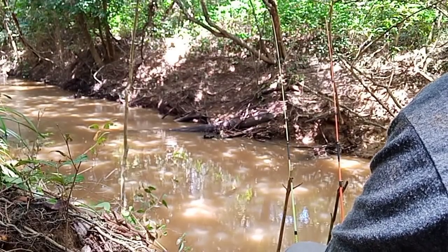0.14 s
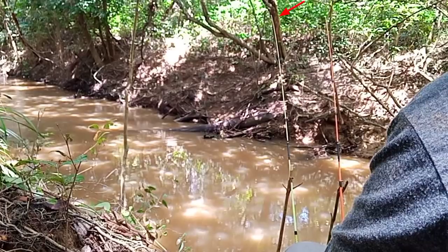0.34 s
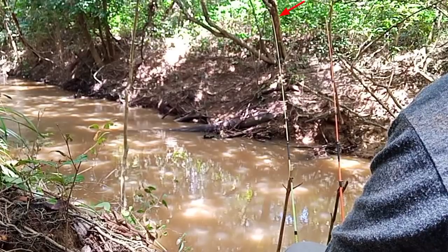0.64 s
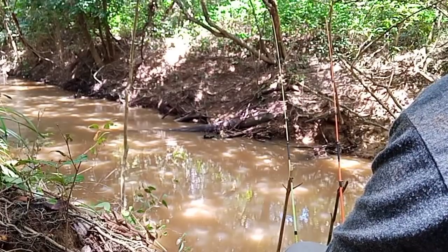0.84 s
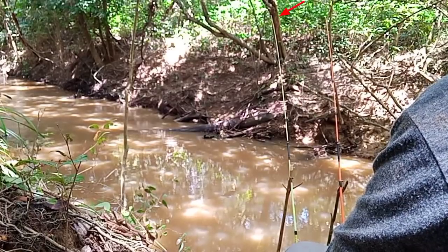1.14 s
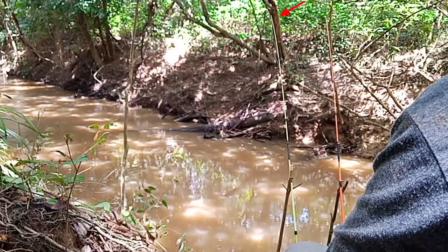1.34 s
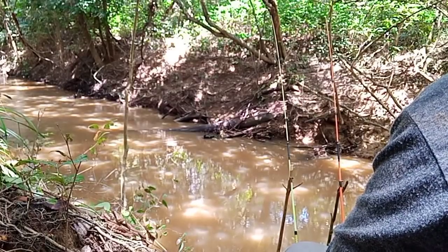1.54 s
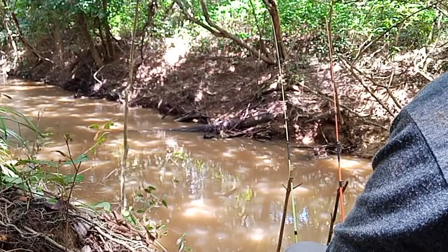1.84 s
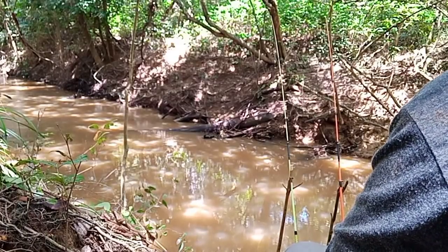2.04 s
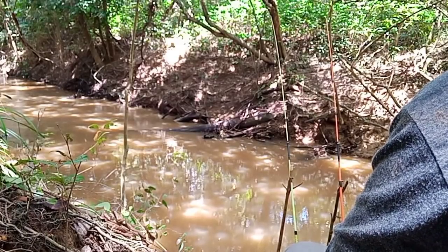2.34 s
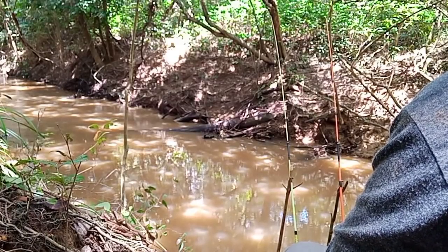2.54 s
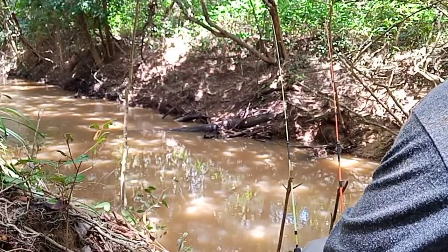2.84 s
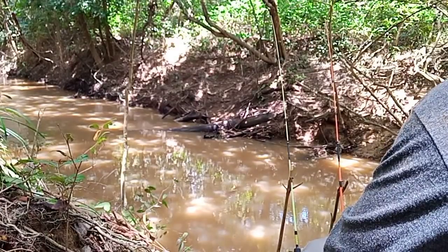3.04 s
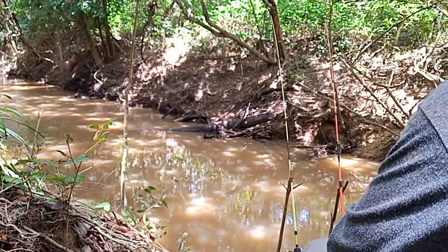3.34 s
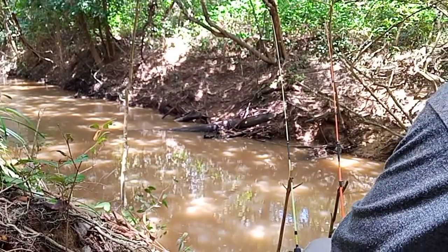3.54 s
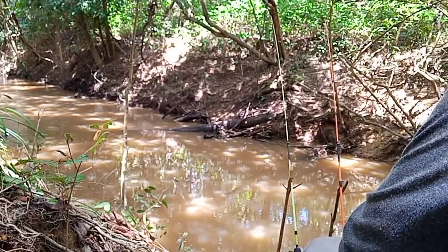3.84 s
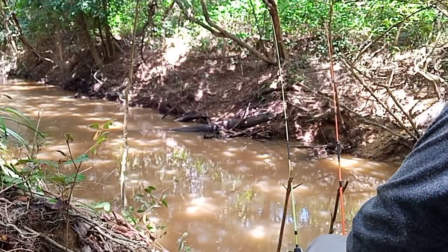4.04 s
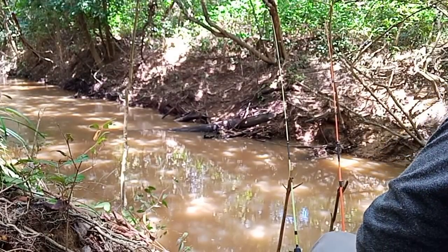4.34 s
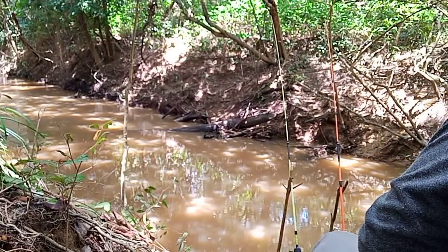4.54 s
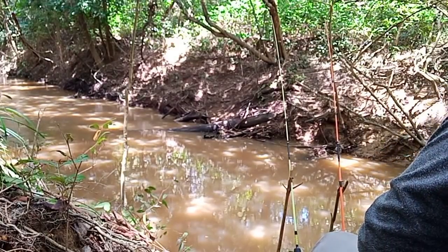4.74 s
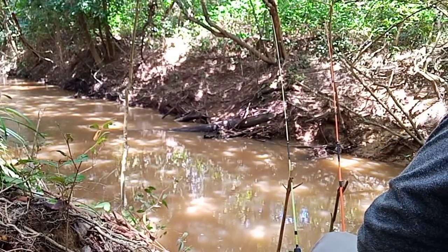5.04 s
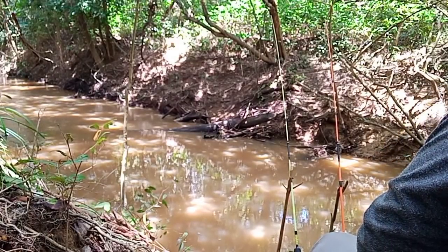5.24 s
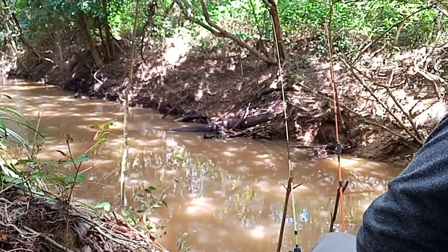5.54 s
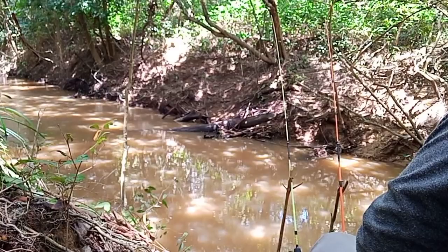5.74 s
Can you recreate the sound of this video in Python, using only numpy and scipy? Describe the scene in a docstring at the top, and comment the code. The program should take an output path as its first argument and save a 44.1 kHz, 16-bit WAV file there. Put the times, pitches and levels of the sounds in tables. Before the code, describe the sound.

On a wooded riverbank, cicadas make a loud, continuous chorus in layers: a shrill sizzle, a dense high drone and a lower rasp. About halfway the chorus dips briefly, then another singer enters in surges and holds. The slow river murmurs very faintly with a few tiny plops. Close to the microphone, a shifting leg gives barely audible bumps and a brush of cloth, followed later by a few light taps.

```python
"""On the wooded bank of a slow, muddy river, cicadas sing a shrill sizzle, a dense drone and a low rasp.
Each voice is an impulse train from buckling tymbal ribs, filtered by the resonance of a hollow body
and scattered by trunks and leaves. One shrill singer fades; a second starts in surges, then holds.
A far insect adds a thin note, and the river murmurs faintly with a few ringing bubbles.
Close by are light taps, padded bumps and a brush of cloth as a leg shifts."""
import sys
import numpy as np
from scipy import signal
from scipy.fft import rfft, irfft, next_fast_len
from scipy.io import wavfile
from scipy.ndimage import map_coordinates

SR = 44100
rng = np.random.default_rng(int(sys.argv[2]) if len(sys.argv) > 2 else 0)


def generate_wav(signal):
    """Clip the signal to [-1, 1] and save it as 16-bit WAV at the path in sys.argv[1]."""
    frames = np.transpose(np.atleast_2d(signal))
    scaled = np.clip(frames, -1, 1) * 32767
    pcm = np.round(scaled).astype(np.int16)
    wavfile.write(sys.argv[1], SR, pcm)


N = 259308


def tymbal(rate, throb_hz, throb_db, jitter_s=.00022):
    """Impulse excitation: ribs buckle at a slightly uneven rate as the abdomen pumps their strength."""
    cycles = rng.random() + np.cumsum(rate * (1 + .008 * wobble(5))) / SR
    clicks = np.flatnonzero(np.diff(np.floor(cycles)))
    lateness, strength = rng.standard_normal((len(clicks), 2)).T
    clicks = (clicks + jitter_s * SR * lateness).astype(int) % N
    pump_cycles = rng.random() + np.cumsum(throb_hz * (1 + .01983 * wobble(2.014))) / SR
    pump = np.sin(2 * np.pi * pump_cycles)
    return np.bincount(clicks, amp(throb_db * pump[clicks] + 1.34 * strength), N)


def crowd(rate, throb_hz, throb_db, wet, count):
    """Incoherent summation: several cicadas add up, each at its own pace and with its own echoes."""
    paces = np.exp(.2 * rng.standard_normal((count, 2)))
    voices = (tymbal(rate * click_pace, throb_hz * throb_pace, throb_db)
              for click_pace, throb_pace in paces)
    return unit(sum(forest(voice, wet, t60=.33) for voice in voices))


# Body resonances of the two shrill singers. Each row: frequency in Hz, relative gain in dB.
FIRST_SINGER_BODY = [(10800, -45), (11600, -28), (11950, -19), (12250, -11), (12550, -3), (12750, -3),
                     (12970, 0), (13250, -6), (13550, -11), (14000, -15), (14400, -11), (14950, -12),
                     (15280, -10.5), (15430, -5), (15600, -20)]
SECOND_SINGER_BODY = [(10200, -40), (11300, -34), (11900, -25), (12400, -17), (12640, -6), (12850, -6),
                      (13040, 0), (13220, -6), (13500, -10), (13900, -15), (14400, -11), (14820, -7),
                      (15120, -14), (15420, -9), (15600, -20)]
# Pace of one tymbal of the second singer. Each row: time in seconds, rate in clicks per second.
SECOND_CLICK_RATE = [(3.1, 126), (4.0, 133), (4.7, 118), (5.2, 122), (5.88, 140)]
def shrill_singers():
    """Source and filter: clicks excite high body resonances, first in a throb, later in a buzz."""
    main_db = lead_db(-24.5, fade_db_per_s=1.3, full_db=-24.8, cold_db=0, slack_db=9.5)
    top_db = lead_db(-28.8, fade_db_per_s=2.2, full_db=-29.7, cold_db=4.8, slack_db=3.8)
    rate = curve(SECOND_CLICK_RATE)
    first = forest(tymbal(186, throb_hz=30.5, throb_db=5.5), wet=.55, t60=.06)
    first += amp(2) * crowd(rate=225, throb_hz=26, throb_db=2.5, wet=.8, count=4)
    # left and right tymbals alternate, which doubles the click rate
    second = forest(tymbal(2 * rate, throb_hz=27, throb_db=3.5, jitter_s=.00007), wet=.5, t60=.08)
    second += amp(-4) * forest(tymbal(rate, throb_hz=27, throb_db=2, jitter_s=.00003), wet=.5, t60=.08)
    second += amp(3) * crowd(rate=230, throb_hz=30, throb_db=2.5, wet=.8, count=3)
    song = handover(coloured(first, FIRST_SINGER_BODY), coloured(second, SECOND_SINGER_BODY))
    top = filtered(song, lambda hz: np.clip((hz - 13500) / 500, 0, 1))
    flutter_db = .5 * wobble(8.5)
    return amp(main_db + flutter_db) * unit(song - top) + amp(top_db) * unit(top)


# The second singer's surges. Each row: peak time in seconds, length in seconds, strength from 0 to 1.
EFFORT_SURGES = [(3.156, 0.072, 0.84), (3.589, .11, .95), (3.996, .18, .6), (4.394, .14, 0.99),
                 (4.68, .14, 0.7)]
def warmth_and_effort():
    """Pulses on a rising baseline: the second singer's effort sags less between surges as it warms."""
    t = np.arange(N) / SR
    warmth = ramp(3.22, 4.96)
    surges = sum(strength * .5 ** (np.abs(2 * (t - peak) / length) ** np.e)
                 for peak, length, strength in EFFORT_SURGES)
    return warmth, warmth + (1 - warmth) * surges


def second_singer_db(full_db, cold_db, slack_db):
    """Level follows drive: a band falls short of full song while the singer is cold or slack."""
    warmth, effort = warmth_and_effort()
    return full_db - cold_db * (1 - warmth) - slack_db * (1 - effort)


# The lead passes between singers. Each row: time in seconds, share of the later set from 0 to 1.
LATE_SHARE = [(2.55, 0.05), (2.84, 0.96)]
def handover(early, late):
    """Constant-power crossfade: one set of singers gives way to the next."""
    angle = np.pi / 2 * curve(LATE_SHARE)
    return np.cos(angle) * early + np.sin(angle) * late


def lead_db(start_db, fade_db_per_s, full_db, cold_db, slack_db):
    """Exponential decay: the first singer's level falls evenly in dB, then yields to the second's."""
    share = curve(LATE_SHARE)
    first_db = start_db - fade_db_per_s * np.arange(N) / SR
    return (1 - share) * first_db + share * second_singer_db(full_db, cold_db, slack_db)


# Spectra before and after the handover. Each row: frequency in Hz, relative gain in dB.
EARLY_DRONE_BAND = [(4900, -56), (5250, -41), (5550, -26), (5850, -14.5), (6100, -5), (6450, 4), (6850, -1),
                    (7250, -1.5), (7650, -7.5), (8100, -19), (8500, -33), (9300, -51)]
LATE_DRONE_BAND = [(4900, -59), (5250, -38.5), (5550, -19.5), (5900, -7), (6300, 1), (6650, 2.5),
                   (7200, -1), (7650, -9), (8100, -13.5), (8500, -26.5), (9300, -48)]
EARLY_SIZZLE_BAND = [(7900, -25), (8450, -4), (8800, -5.5), (9200, 1), (9400, -2.5), (9620, 3.5),
                     (9900, -0.5), (10050, -5), (10450, -5.5), (11100, -14), (12000, -40)]
LATE_SIZZLE_BAND = [(7900, -28), (8450, -4.5), (8800, -1.5), (9200, 6), (9700, 3), (10200, 0), (11100, -14),
                    (12000, -22)]
def drone():
    """Superposition: many click trains merge into one loud band, with a weak, high sizzle above it."""
    clicks = crowd(rate=260, throb_hz=33, throb_db=2.5, wet=.83, count=6)
    main = handover(amp(-25) * coloured(clicks, EARLY_DRONE_BAND),
                    amp(-27) * coloured(clicks, LATE_DRONE_BAND))
    # the sizzle lies between the drone and the shrill band, rising and falling with the lead singers
    sizzle_db = lead_db(-40, fade_db_per_s=1, full_db=-43, cold_db=2.5, slack_db=2)
    sizzle = handover(coloured(clicks, EARLY_SIZZLE_BAND), amp(-1) * coloured(clicks, LATE_SIZZLE_BAND))
    return main + amp(sizzle_db) * sizzle


# Body resonance of the lowest voices. Each row: frequency in Hz, relative gain in dB.
RASP_BAND = [(2550, -36), (2820, -24.5), (3020, -1.5), (3170, -4), (3320, 4), (3450, -3), (3600, -3.5),
             (3800, -10.5), (4200, -21.5), (4700, -30.5), (5300, -37)]
def rasp():
    """Amplitude modulation: the lowest voices rattle with a throb that quickens at the handover."""
    level_db = lead_db(-38.5, fade_db_per_s=1.8, full_db=-40.2, cold_db=4, slack_db=2.5)
    early = tymbal(222, throb_hz=26.3, throb_db=5)
    late = tymbal(248, throb_hz=42.7, throb_db=5)
    near = forest(handover(early, late), wet=.58, t60=.15)
    clicks = near + amp(1.5) * crowd(rate=190, throb_hz=45, throb_db=2.5, wet=.54, count=4)
    body = coloured(clicks, RASP_BAND)
    ring = handover(0, resonance(3322, width_hz=13))  # the later lead has a sharply tuned abdomen
    upper_edge = coloured(clicks, [(3400, 5), (3700, -12), (4100, -2), (4500, -17), (5100, -33)])
    fluttering_edge = unit(upper_edge * amp(3.5 * wobble(40)))
    edge_on = ramp(3.9, 3.9)
    return amp(level_db) * unit(body + amp(-17) * edge_on * fluttering_edge + amp(-10) * ring)


SLACK_HZ, TAUT_HZ = 9400, 9840
RATTLE_HZ, RATTLE_DB = 36, 2.8
def whine_and_hiss():
    """Tuned resonance: the second singer's whine rises in pitch with effort, with a hiss above it."""
    warmth, effort = warmth_and_effort()
    hz = SLACK_HZ + (TAUT_HZ - SLACK_HZ) * effort
    tone = unit(resonance(hz, width_hz=130) + warmth * resonance(hz, width_hz=35))  # purer when warm
    whine = handover(0, amp(second_singer_db(-47.5, cold_db=.79, slack_db=3.4)) * tone)
    rattle = np.sin(2 * np.pi * np.cumsum(RATTLE_HZ * (1 + .05 * wobble(6))) / SR)
    hiss_db = -50.5 + (1 - warmth) * (6.5 + RATTLE_DB * rattle)  # louder and rattling while cold
    hiss = amp(hiss_db) * resonance(1.265 * hz, width_hz=420)
    return whine + ramp(2.92, 3.1) * hiss


def chorus_dip(depth_db, deepest_s=2.78, fall_s=.2, recover_s=.06):
    """Asymmetric envelope: the level sinks briefly and recovers faster than it fell."""
    sunk = ramp(deepest_s - fall_s, deepest_s) - ramp(deepest_s, deepest_s + recover_s)
    return amp(-depth_db * sunk)


def forest(x, wet, t60):
    """Multipath scattering: trunks and swaying leaves return the share `wet` of the power as echoes."""
    t = np.arange(N) / SR
    tail_len = SR // 3
    tails = rng.standard_normal((2, tail_len)) * amp(-60 * t[:tail_len] / t60)
    looped = np.pad(x, (tail_len - 1, 0), "wrap")
    paths = signal.oaconvolve(looped[None], tails, "valid", axes=1)
    sway = 2 * np.pi * (rng.random() + rng.uniform(.648, 1.3) * t)
    scattered = np.cos(sway) * paths[0] + np.sin(sway) * paths[1]
    return np.sqrt(1 - wet) * unit(x) + np.sqrt(wet) * unit(scattered)


# A far insect's notes. Each row: start in seconds, end in seconds, level in dB.
FAR_NOTES = [(-.2, .5, -53), (1.6, 2.75, -51.5)]
def far_insect(fade_s=.11):
    """Gated narrow-band resonance: a thin, steady note comes and goes."""
    envelope = sum(amp(db) * (ramp(start, start + fade_s) - ramp(end - fade_s, end))
                   for start, end, db in FAR_NOTES)
    return envelope * resonance(8802, width_hz=60)


# Close taps. Each row: start in seconds, knock gain in dB, snap level in dB.
TAP_HITS = [(3.922, -40, -51), (4.123, -61, -66), (4.912, -66, -43)]
# Their modes. Each row: frequency in Hz, relative level in dB, time to decay by 60 dB in seconds.
KNOCK_MODES = [(191, -20, 0.092), (335, -18.5, 0.092), (578, -10.5, 0.065), (690, -6, 0.061),
               (1360, 2, 0.034), (1470, -1, 0.033), (1620, -2, 0.034), (2040, -3.5, 0.026),
               (2320, -5, 0.04)]
def taps():
    """Modal ringing: each light impact excites damped modes, with a dull crack and a bright snap."""
    knocks, crack_envelope, snap_envelope = np.zeros((3, N))
    t = np.arange(SR // 5) / SR
    ring = sum((-1) ** k * amp(db - 60 * t / t60) * np.sin(2 * np.pi * hz * t)
               for k, (hz, db, t60) in enumerate(KNOCK_MODES))
    attack = 1 - np.exp(-t / .00064)
    for start, knock_db, snap_db in TAP_HITS:
        hit = slice(round(start * SR), round(start * SR) + len(t))
        knocks[hit] += amp(knock_db) * ring * attack
        crack_envelope[hit] += amp(knock_db - 12 - 60 * t / .07) * attack
        snap_envelope[hit] += amp(snap_db - 60 * t / .074)
    crack = noise([(100, -9), (400, 4), (650, 5), (1000, -5), (1400, -11), (2400, 2), (3500, -16)])
    snap = noise([(200, -30), (1500, -23), (3200, -18), (4800, 6), (9000, -4)])
    return knocks + crack_envelope * crack + snap_envelope * snap


# The river's wash. Each row: frequency in Hz, relative spectral density in dB.
WASH_SPECTRUM = [(15, -34), (25, -4), (139, 0.5), (262, -4.5), (306, -6), (715, -5.5), (1090, -8.5),
                 (1320, -7), (1800, -7.5), (2500, -8), (3250, -31), (5500, -120)]
# Small plops in the water. Each row: start in seconds, pitch in Hz, relative level in dB.
BUBBLES = [(.16, 600, -60), (.235, 1850, -57.5), (.42, 587, -57), (.49, 580, -63), (.745, 630, -65),
           (2.66, 990, -62), (3.78, 328, -58.5)]
def river():
    """Broadband noise of water and leaves, with bubbles that ring as damped oscillators."""
    wash = amp(-68.5 + 1.1 * wobble(7.7)) * noise(WASH_SPECTRUM)
    murmur = amp(-77.5 + 1.4 * wobble(8.4)) * noise([(70, -19), (140, -2.5), (300, -1), (480, -13)])
    hiss = amp(-67.5) * noise([(1200, -36), (2400, -11), (5200, -8.5), (9000, -8)])
    plops = np.zeros(N)
    t = np.arange(SR // 4) / SR
    envelope = (1 - np.exp(-t / .0059)) * amp(-60 * t / .092)
    for start, hz, db in BUBBLES:
        plops[round(start * SR):][:len(t)] += amp(db + 6.5) * envelope * np.sin(2 * np.pi * hz * t)
    return wash + murmur + hiss + plops


# Soft bumps close by. Each row: time in seconds, peak level in dB.
SOFT_BUMPS = [(2.21, -68), (2.32, -69), (2.41, -69), (2.65, -65), (2.82, -70)]
def bumps():
    """Cushioned impact: padded contacts, as of a leg shifting on the bank, give only low frequencies."""
    t = np.arange(N) / SR
    envelope = sum(amp(db) * np.exp(-((t - at - .015) / .021) ** 2) for at, db in SOFT_BUMPS)
    return envelope * noise([(70, -15), (130, 3), (210, 0), (360, -9), (520, -18)])


def cloth_rustle(middle_s=2.58, half_length_s=.095):
    """Friction noise: cloth brushes softly and unevenly as the leg shifts."""
    stroke = np.exp(-((np.arange(N) / SR - middle_s) / half_length_s) ** 2)
    cloth = noise([(800, -22), (2500, -20), (4800, 4), (9000, -4)])
    return amp(-63 + 2.9 * wobble(50)) * stroke * cloth


def resonance(hz, width_hz):
    """Randomly driven resonance: slow noise on two carriers in quadrature makes a rough tone."""
    swing = filtered(rng.standard_normal((2, N)), lambda f: 1 / (1 + (f / width_hz) ** 2))
    phase = 2 * np.pi * np.cumsum(hz * np.ones(N)) / SR
    return unit(swing[0] * np.cos(phase) + swing[1] * np.sin(phase))


def noise(spectrum):
    """Coloured noise: white noise shaped by a spectrum."""
    return coloured(rng.standard_normal(N), spectrum)


def coloured(x, spectrum):
    """Spectral shaping: x through (Hz, dB) points, silent outside them, at rms 1."""
    points_hz, db = np.transpose(spectrum)
    log_hz = np.log(np.sort(points_hz))
    return unit(filtered(x, lambda hz: amp(np.interp(np.log(hz + 1), log_hz, db, left=-120, right=-120))))


def filtered(x, response):
    """Linear filtering: the spectrum of x is multiplied by a frequency response."""
    size = next_fast_len(N + SR // 2)
    return irfft(rfft(x, size) * response(np.fft.rfftfreq(size, 1 / SR)), size)[..., :N]


def wobble(rate):
    """Slow random modulation: a spline through `rate` random knots a second."""
    knots = rng.standard_normal(int(N * rate / SR) + 4)
    return map_coordinates(knots, [np.arange(N) * rate / SR])


def curve(rows):
    """Linear interpolation of (seconds, value) rows, one value per sample."""
    return np.interp(np.arange(N) / SR, *np.transpose(rows))


def ramp(start_s, end_s):
    """Linear rise from 0 to 1; equal times give a step."""
    return np.clip((np.arange(N) / SR - start_s) / max(end_s - start_s, 1 / SR), 0, 1)


def amp(db):
    """Decibels to amplitude ratio."""
    return 10 ** (np.asarray(db) / 20)


def unit(x):
    """Normalisation to rms 1."""
    return x / np.sqrt(np.mean(x ** 2) + 1e-20)


def scene():
    """Superposition: all sources add at a single microphone, which feeds both channels."""
    chorus = chorus_dip(depth_db=4.4) * drone()
    near_singers = chorus_dip(depth_db=1.2) * (rasp() + shrill_singers() + whine_and_hiss())
    mono = chorus + near_singers + far_insect() + river() + taps() + bumps() + cloth_rustle()
    return np.array([mono, mono])


BAND_LIMIT_HZ = 15560
def record(dry):
    """Ideal low-pass filtering: nothing above the band limit passes."""
    return filtered(dry, lambda hz: hz < BAND_LIMIT_HZ)


dry = scene()
out = record(dry)
generate_wav(out)
```